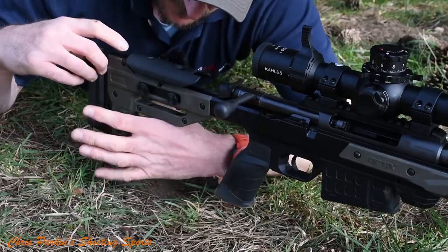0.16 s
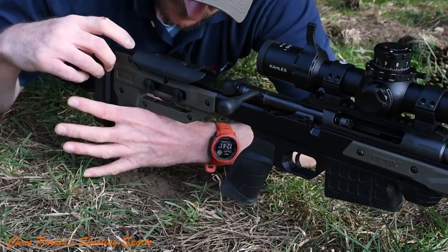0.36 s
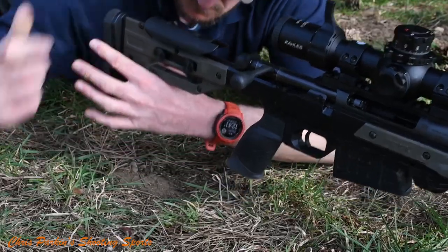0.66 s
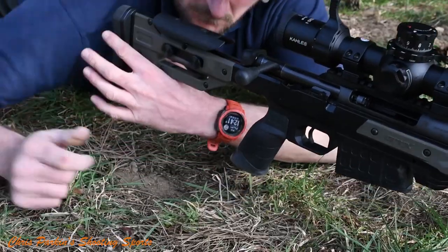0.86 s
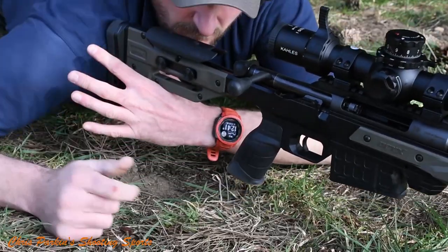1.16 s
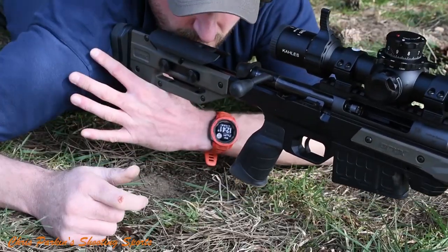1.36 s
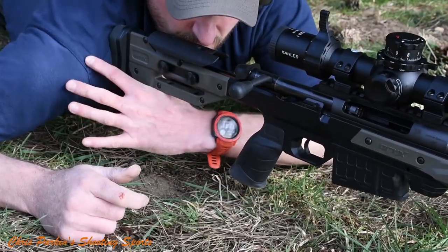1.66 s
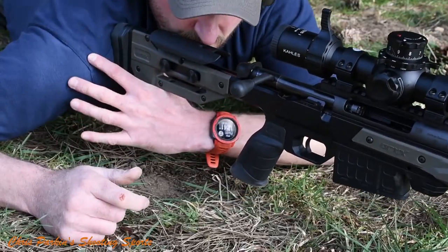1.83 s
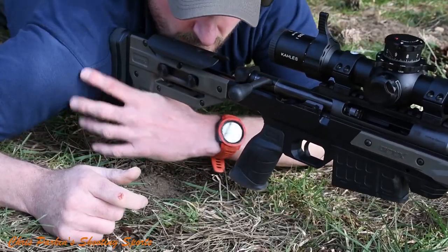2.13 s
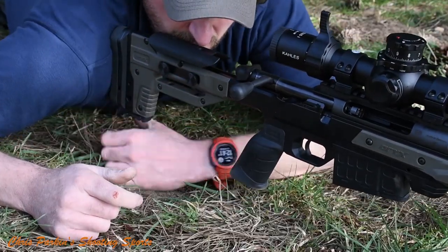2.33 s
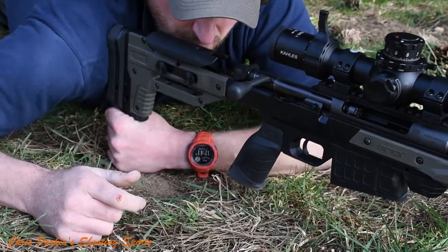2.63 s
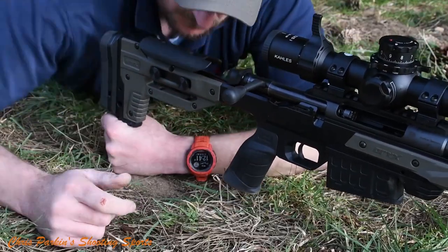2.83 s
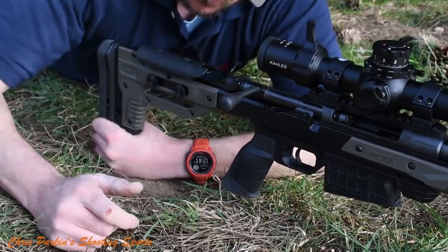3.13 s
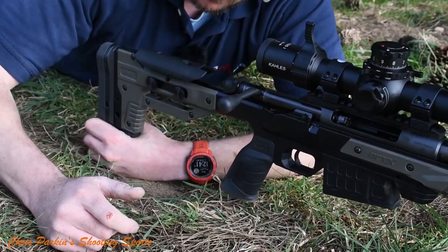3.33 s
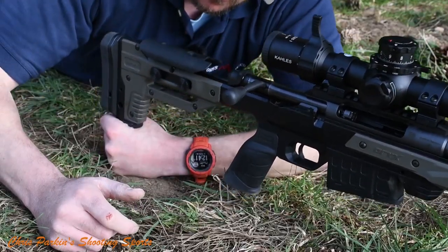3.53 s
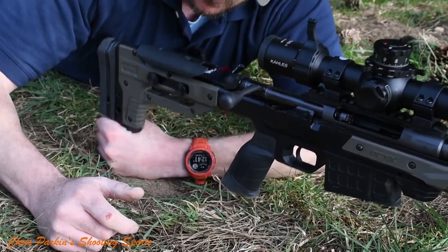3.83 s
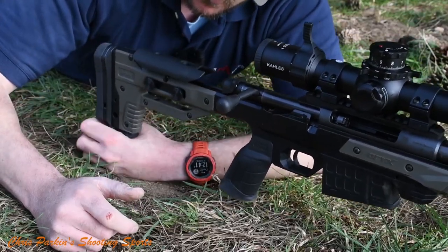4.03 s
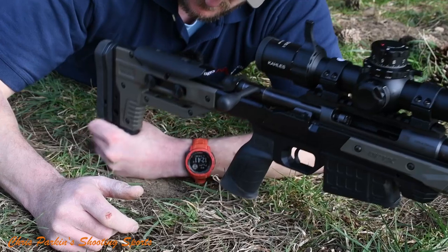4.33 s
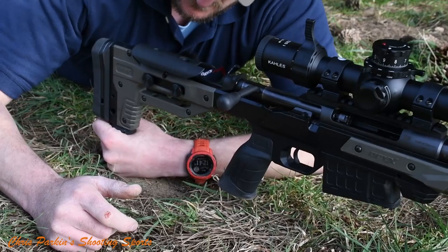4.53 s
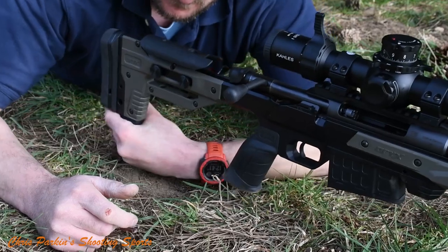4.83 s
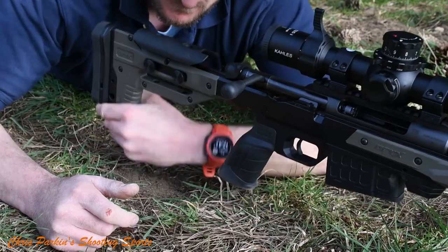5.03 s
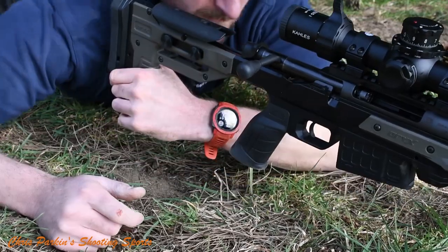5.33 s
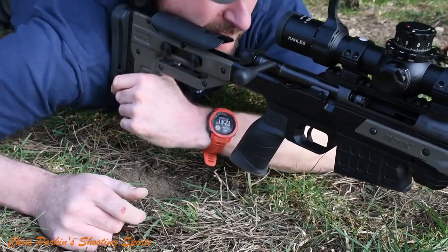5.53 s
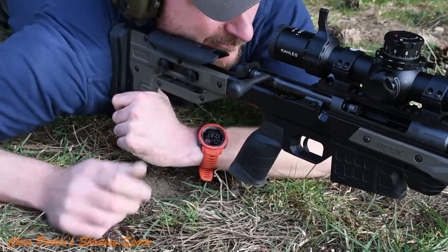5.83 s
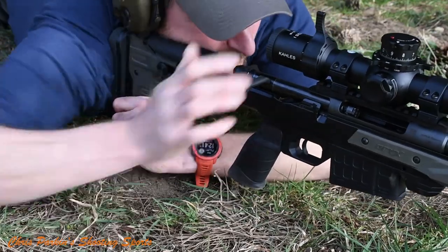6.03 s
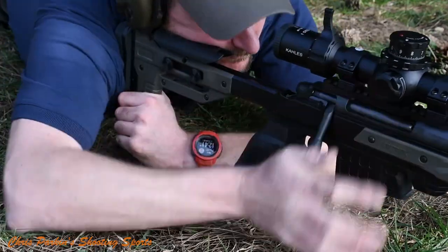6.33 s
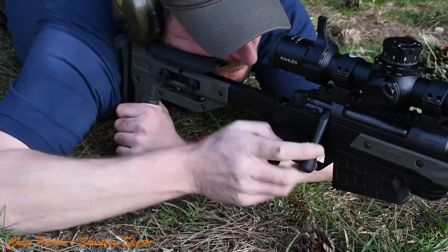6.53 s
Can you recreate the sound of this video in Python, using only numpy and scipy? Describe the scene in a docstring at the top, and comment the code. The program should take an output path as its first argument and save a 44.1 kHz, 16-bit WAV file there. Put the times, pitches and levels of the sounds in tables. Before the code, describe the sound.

A close microphone catches soft fabric and grass rustling, hollow drags on the stock, short skin-on-rubber rubs with little squeaky pips, scattered dry clicks and low thumps, all quiet in open still air. Near the end comes a tight burst of hard steel: bolt lifted, slammed back so loudly it distorts, then pushed home and locked, very dry, without echo.

```python
"""Working a rifle bolt on grass

Outdoors on grass, close to a single microphone. Hands and sleeves shift around a rifle stock as shaped friction noise,
with ticks as short cracks and rings, wipes on rubber pad and stock and a few short pitched pips as noise through
gliding resonances, and bumps of the stock as sliding low tones. Then the steel bolt is lifted, slammed back, pushed
home and locked: bursts of contact force ring the modes of the steel, pushes ring the stock, and slips scrape the
steel. Still air and hiss lie beneath."""
import sys
import numpy as np
from scipy import signal
from scipy.fft import rfft, irfft
from scipy.io import wavfile
from scipy.ndimage import uniform_filter1d, map_coordinates

SR = 44100
rng = np.random.default_rng(int(sys.argv[2]) if len(sys.argv) > 2 else 0)


def elevation(decibels):
    """Turn decibel levels (scalar or array-like) into linear amplitude ratios."""
    levels = np.asarray(decibels, float)
    return 10 ** (levels / 20)


def store_wav(level_fs):
    """Save 16-bit WAV to argv[1]."""
    pcm = np.round(np.clip(np.atleast_2d(level_fs), -1, 1) * 32767)
    wavfile.write(sys.argv[1], SR, pcm.T.astype(np.int16))


N = 294147  # length in samples

# Spectrum of a dry crack. Each row: frequency in Hz, relative level in dB.
CRACK_TONE = [(200, -12.5), (1000, -8), (3000, 2.5), (7000, 1), (11000, -4), (16000, -29)]
# Ringing modes of bolt and receiver. Each row: frequency in Hz, relative level in dB, 60 dB decay in seconds.
STEEL_MODES = [(930, -2.5, 0.011), (1340, -0.5, 0.012), (1490, 0, 0.016), (1730, -2, 0.021),
               (2090, -5.5, 0.014), (2725, -11.5, 0.018), (2934, -1.5, 0.012), (3650, -1.5, 0.004),
               (4200, -8, 0.005), (4700, -6, 0.0029), (5580, -1, 0.0085), (6400, -8, 0.016),
               (7200, 0, 0.0054), (7970, -2, 0.0057), (10000, -20.5, 0.019), (11100, -18.5, 0.0031)]


def evened(x):
    """Scales to rms 1."""
    return x / np.sqrt(np.mean(x ** 2) + 1e-20)


def add(mix, start_s, sound):
    """Mixes a sound in at start_s, cut where the mix ends."""
    part = mix[round(start_s * SR):][:len(sound)]
    part += sound[:len(part)]


def coloured(x, points):
    """Filters x by a curve of (Hz, dB) points, then scales it to rms 1."""
    point_hz, point_db = np.transpose(points)
    hz = np.fft.rfftfreq(len(x), 1 / SR)
    curve_db = np.interp(np.log(hz + 1), np.log(point_hz + 1), point_db)
    return evened(irfft(rfft(x) * elevation(curve_db), len(x)))


def resonant(x, peaks):
    """Passes x through (Hz, width in Hz, dB) resonances, then scales it to rms 1."""
    hz = np.fft.rfftfreq(len(x), 1 / SR)
    shape = sum(elevation(db) / (1 + (2 * (hz - centre) / width) ** 2) for centre, width, db in peaks)
    return evened(irfft(rfft(x) * shape, len(x)))


def ring(modes, tilt_db=0, favoured_hz=1, favour_db=0):
    """Impulse response of decaying modes, tilted per octave about 2 kHz and lifted near one pitch."""
    t = np.arange(SR // 4) / SR
    out = 0
    for k, (hz, db, t60) in enumerate(modes):
        octaves_off = np.log2(hz / favoured_hz)
        db += tilt_db * np.log2(hz / 2000) + favour_db * np.exp(-(octaves_off / 0.23) ** 2)
        sign = (-1) ** k
        out = out + sign * elevation(db - 60 * t / t60) * np.sin(2 * np.pi * hz * t)
    return out


def friction(per_s, spread_db, lumpy_db):
    """Tiny slips of uneven size over a smooth hiss; the pressure wavers in lumps of about 15 ms."""
    slip_size = elevation(spread_db * np.minimum(rng.exponential(1, N), 4))
    slips = slip_size * (rng.random(N) < per_s / SR)
    smoothed = uniform_filter1d(rng.standard_normal(N), size=500)
    lumps = evened(uniform_filter1d(smoothed, size=500))
    return (1 + slips) * elevation(lumpy_db * lumps) * rng.standard_normal(N)


def pressure(strokes, rise_s, arch_db, sag_db, release_s):
    """Gain for every sample from (start s, length s, dB) strokes that rise, arch, sag and let go."""
    t = np.arange(N) / SR
    power = 0
    for start_s, length_s, db in strokes:
        # distance outside the stroke, in time constants: it rises ahead of the start
        edge = np.where(t < start_s, (start_s - t) / rise_s, np.maximum(t - start_s - length_s, 0) / release_s)
        done = np.clip((t - start_s) / length_s, 0, 1)
        stroke_db = db + arch_db * (2 * done - 1) ** 2 + sag_db * done
        power = power + (elevation(stroke_db) * np.exp(-edge)) ** 2
    return np.sqrt(power)


def air():
    """Still air and microphone hiss: steady coloured noise as a middle signal and a weaker side signal."""
    # Hiss spectra of middle and side. Each row: frequency in Hz, relative level in dB per Hz.
    middle_tone = [(15, -26.5), (25, -6.5), (70, 3.5), (180, -6), (309, -3), (384, -9), (531, -10.5),
                   (840, -14.5), (3340, -20), (14400, -22), (16000, -30)]
    side_tone = [(15, -47.5), (25, -9), (217, -1), (249, -3.5), (373, -2.5), (1890, -6), (12500, -6.5),
                 (16000, -8.5)]
    middle = elevation(-58.5) * coloured(rng.standard_normal(N), middle_tone)
    side = elevation(-63) * coloured(rng.standard_normal(N), side_tone)
    return middle, side


def crackle():
    """Dry grass snapping: sparse snaps of uneven size, each dying in a few milliseconds."""
    per_s, t60_s = 45, 0.0064
    t = np.arange(400) / SR
    out = 0
    for snap in rng.standard_normal((8, len(t))):  # eight different snaps share the rate
        size = elevation(2.8 * np.minimum(rng.exponential(1, N), 3))
        hits = size * (rng.random(N) < per_s / 8 / SR)
        out = out + signal.oaconvolve(hits, coloured(snap, CRACK_TONE) * elevation(-60 * t / t60_s))[:N]
    return evened(out)


def handling():
    """Every move rustles cloth, drags the stock and rumbles through the ground, each by its own share."""
    # Shifts of hand, sleeve or body. Each row: start in seconds, length in seconds, sleeve and grass rustle
    # in dB, dragged stock in dB relative to the rustle, rumble in dB relative to the rustle.
    moves = [(0.0, 0.051, -60.5, -8, -14), (0.221, 0.12, -56.5, -7.5, -8), (0.356, 0.12, -73.5, -10, 16),
             (0.538, 0.086, -65, -7, 9), (0.58, 0.15, -58.5, -4, -6), (0.775, 0.074, -55.5, -1, 1),
             (0.862, .22, -56.5, -0.5, 2), (1.121, .16, -60, 2, 1), (1.35, 0.14, -65.5, -0.5, 4),
             (1.544, 0.062, -61.5, -3, 2.5), (1.62, .13, -74.5, -9, 14.5), (1.84, 0.28, -85, -4, 12),
             (2.16, 0.076, -59, -0.5, -3), (2.224, 0.071, -56.5, -1.5, -10),
             (2.303, 0.096, -50.5, -10, -1.5), (2.41, .13, -50, -13, -5.5), (2.617, 0.15, -54, -5.5, 0),
             (2.811, 0.17, -58, -0.5, 1.5), (2.97, 0.12, -54.5, -4, -3), (3.105, 0.23, -63, -3.5, 3.5),
             (3.35, 0.058, -60, -6, 0.5), (3.478, 0.11, -61.5, -3.5, -2.5), (3.675, 0.095, -60.5, -4.5, -5),
             (3.853, 0.13, -63, -3.5, 3), (3.997, 0.097, -59, -5.5, -4.5), (4.122, 0.078, -59.5, -3, 0),
             (4.22, .05, -58, -19, -9), (4.292, 0.15, -58.5, -9.5, -1.5), (4.46, 0.15, -65, -8, 5),
             (4.592, 0.038, -61.5, -1, 1), (4.644, 0.017, -49.5, -8, -2.5), (4.7, 0.13, -57, -11, -0.5),
             (4.81, 0.16, -58, -5, 3.5), (4.951, 0.18, -56.5, -6, -4), (5.129, 0.19, -56, 1.5, -2),
             (5.304, 0.11, -67, 1.5, 5), (5.398, 0.13, -66, 3.5, 2.5), (5.584, 0.16, -60, 4, 7.5),
             (5.809, 0.036, -63, 8, 8.5), (5.877, 0.083, -54.5, -4.5, -0.5), (5.952, 0.21, -59, 6, 7.5),
             (6.264, 0.031, -57, 11.5, 14.5), (6.376, 0.038, -59.5, 9.5, 18), (6.44, .1, -56.5, 2, 10),
             (6.565, 0.029, -57.5, 2, 13), (6.604, 0.053, -60.5, 0.5, 15)]
    # Spectra of rustle and rumble. Each row: frequency in Hz, relative level in dB per Hz.
    rustle_tone = [(120, -24.5), (200, -26.5), (249, -17), (322, -17), (424, -9), (2420, -19.5),
                   (4200, -14), (9060, -15), (16000, -19.5)]
    rumble_tone = [(24, -27.5), (40, 2.5), (81, -12), (119, 0.5), (151, -1.5), (297, 3.5), (401, -4.5),
                   (900, -15), (1170, -26.5), (1980, -120)]
    # Resonances of the dragged stock. Each row: frequency in Hz, width in Hz, relative level in dB.
    drag_peaks = [(750, 1800, 0), (1500, 1100, -4.5), (2047, 1500, -2.5)]
    start_s, length_s, db, drag_db, rumble_db = np.transpose(moves)
    cloth, stock, ground = (
        pressure(zip(start_s, length_s, db + share_db), rise_s=0.018, arch_db=-4, sag_db=-1, release_s=0.033)
        for share_db in (0, drag_db, rumble_db))
    fibres = friction(per_s=400, spread_db=4.0, lumpy_db=1.8)
    rustle = cloth * (coloured(fibres, rustle_tone) + elevation(-9) * crackle())
    drag = stock * resonant(friction(per_s=150, spread_db=4.1, lumpy_db=1.5), drag_peaks)
    # the rumble heaves at random, by a new amount ten times a second
    knots = rng.standard_normal(200)
    heave = elevation(0.5 * np.interp(np.arange(N) / SR * 10, np.arange(len(knots)), knots))
    rumble = ground * heave * coloured(friction(per_s=60, spread_db=3.6, lumpy_db=1.3), rumble_tone)
    return rustle + drag + rumble


def ticks():
    """Loose parts and dry stalks tick: a brief dry crack with one short ring and a dull knock."""
    # Each row: start in seconds, level in dB, ring in Hz, crack in dB relative to that level.
    tick_list = [(0.164, -48.5, 2400, 1.5), (0.344, -45.5, 730, -2), (0.591, -39.5, 1400, -3),
                 (0.816, -39.5, 1780, 4), (0.846, -47, 1210, -2), (0.993, -43, 1250, -10),
                 (1.027, -43.5, 2610, -7), (1.055, -49.5, 1270, 8), (1.082, -42, 2310, -5),
                 (1.2, -47.5, 2200, 3), (1.27, -41, 842, -12), (1.579, -52, 1980, 7),
                 (1.771, -50, 5600, 0.5), (2.16, -34.5, 1770, -2), (2.167, -43, 1810, -1),
                 (2.725, -49, 970, -15), (2.961, -36.5, 6000, 3.5), (2.973, -43, 1310, 3),
                 (3.573, -47.5, 6040, -1), (3.924, -46, 5560, 3), (4.067, -47, 2500, 4),
                 (4.117, -48, 2900, -4), (4.13, -47.5, 1800, 1), (4.22, -41, 3400, 2),
                 (4.408, -45.5, 4070, -1), (4.439, -46.5, 1790, -2), (4.469, -50, 1900, -3),
                 (4.657, -41.5, 4200, 8), (4.811, -37, 2000, -4.5), (5.356, -49, 9000, -6),
                 (6.11, -43, 1300, -7), (6.426, -36, 900, -8)]
    knock_hz, knock_db, knock_t60_s = 600, -6, 0.006
    crack_t60_s, ring_t60_s, ring_rise_s = 0.0068, 0.014, 0.00057
    out, t = np.zeros(N), np.arange(1500) / SR
    knock = np.sin(2 * np.pi * knock_hz * t) * elevation(knock_db - 60 * t / knock_t60_s)
    for start_s, db, hz, crack_db in tick_list:
        crack = coloured(rng.standard_normal(len(t)), CRACK_TONE) * elevation(-60 * t / crack_t60_s)
        tone = np.sin(2 * np.pi * hz * t) * elevation(-60 * t / ring_t60_s) * np.minimum(t / ring_rise_s, 1)
        add(out, start_s, elevation(db) * (elevation(crack_db) * crack + tone + knock))
    return out


def wipes():
    """Skin slides on rubber and stock, with a few short pitched pips: noise that swells and stops."""
    # Each row: crest in seconds, level in dB, swell time in seconds, pitch in Hz of the hollow under the palm
    # or of the pip, glide of that pitch in octaves per second.
    wipe_list = [(0.322, -48, 0.043, 3940, -1.5), (0.615, -56.5, 0.038, 4360, 2),
                 (2.26, -61.5, 0.11, 4740, 1), (2.42, -55.5, 0.091, 4700, 1),
                 (2.69, -56.5, 0.053, 4700, -1), (3.21, -61, 0.056, 4330, 3),
                 (3.37, -59.5, 0.037, 4500, -2), (3.525, -55, 0.033, 4200, -7.5),
                 (3.7, -57.5, 0.028, 4580, 1.5), (3.89, -53.5, 0.026, 4200, -1.5),
                 (3.957, -58, 0.008, 1410, -5), (4.022, -61.5, .022, 4300, 2), (4.171, -54, 0.025, 4350, 1),
                 (4.255, -57.5, .009, 1520, -2), (4.66, -56, 0.023, 4430, 0.5),
                 (4.785, -58, 0.05, 4020, -1.5), (4.85, -61, .05, 2000, 0.5),
                 (4.881, -52.5, 0.02, 4800, 7.5), (5.065, -58, 0.032, 4700, 1),
                 (5.28, -52, 0.0069, 3550, 5), (5.646, -54, 0.11, 1500, 0.5), (6.05, -56, 0.1, 1500, 0),
                 (6.49, -56, 0.03, 5070, -0.5)]
    # Resonances of each sound. Each row: multiple of its pitch, width as a share of its pitch, level in dB.
    hollow = [(.78, 0.15, -3.5), (1., 0.18, 4.5), (1.17, 0.16, -1), (1.9, 1, -9)]
    half = 8000  # samples on either side of the crest
    stop_share = 0.54  # each sound dies in this share of its swell
    out, t = np.zeros(N + SR), np.arange(-half, half) / SR
    rub = friction(per_s=300, spread_db=4.5, lumpy_db=1.5)
    for crest_s, db, swell_s, pitch_hz, glide in wipe_list:
        at = round(crest_s * SR)
        peaks = [(k * pitch_hz, width * pitch_hz, lift_db) for k, width, lift_db in hollow]
        noise = resonant(np.roll(rub, -at)[:len(t)], peaks)
        # reading faster or slower bends every resonance together, by 0.4 octave at most
        place = np.cumsum(2 ** np.clip(glide * t, -0.4, 0.4))
        noise = map_coordinates(noise, [place - place[half] + half], order=3, mode="wrap")
        swell = np.exp(-(t / np.where(t < 0, swell_s, stop_share * swell_s)) ** 2)
        out[at:at + len(t)] += elevation(db) * noise * swell
    return out[half:][:N]


def bumps():
    """The stock bumps on shoulder or hand: a decaying low tone whose pitch settles within milliseconds."""
    # Each row: start in seconds, level in dB, approximate first pitch in Hz, last pitch in Hz,
    # 60 dB decay in seconds.
    bump_list = [(0.8957, -36, 187, 164, 0.09), (0.907, -27.5, 160, 50, 0.054),
                 (1.386, -46.5, 150, 133, 0.18), (1.624, -43, 201, 241, 0.11), (4.66, -43, 200, 95, 0.084),
                 (4.811, -36.5, 300, 168, 0.034), (5.132, -33, 293, 55.3, 0.12),
                 (6.602, -32.5, 200, 115, 0.12)]
    out, t = np.zeros(N), np.arange(8000) / SR
    for start_s, db, first_hz, last_hz, t60 in bump_list:
        turns = last_hz * t + (first_hz - last_hz) * 0.0042 * (1 - np.exp(-t / 0.0037))
        add(out, start_s, elevation(db - 60 * t / t60) * np.sin(2 * np.pi * turns))
    return out


def bolt_blows():
    """Each blow of steel on steel chatters briefly, ringing the steel and thudding into the stock."""
    # Each row: start in seconds, peak of the steel ring in dB, chatter in seconds, thud gain in dB relative
    # to that peak, frequency in Hz that this contact favours.
    blow_list = [(6.1325, -34, 0.00034, -11, 750), (6.163, -29.5, 0.0023, -9, 1870),
                 (6.172, -23.5, 0.0021, -5.5, 710), (6.185, -27.5, 0.0065, -12, 960),
                 (6.195, -28, 0.003, -8, 1340), (6.2201, -10, 0.0052, -9, 700),
                 (6.2284, -12, 0.0046, -18.5, 10000), (6.231, -13, 0.0072, -29.5, 1620),
                 (6.239, 8, 0.0038, -20, 1730), (6.2476, -6.5, 0.0023, -39.5, 1730),
                 (6.29, -34.5, .002, -10.5, 1620), (6.355, -22, 0.0013, -21, 3650),
                 (6.3726, -3, 0.0024, -19, 1600), (6.5985, -19.5, 0.00044, -25, 1770)]
    # Modes of the stock. Each row: frequency in Hz, relative level in dB, 60 dB decay in seconds.
    stock_modes = [(133, -8, 0.15), (265, -11.5, 0.068), (377, -5, 0.082), (446, -8.5, 0.2),
                   (588, -2.5, 0.049), (702, 1, 0.051)]
    # a blow that thuds is padded and dull: tilt in dB per octave of a clean blow, thud in dB where dulling
    # starts, and tilt lost per dB of thud beyond that
    clean_tilt_db, padded_from_db, dulling = 1.66, -19, 0.38
    out, t = np.zeros(N), np.arange(1500) / SR
    push = signal.windows.hann(24) / 12  # the softer stock feels only the mean force
    thud = signal.fftconvolve(push, ring(stock_modes))
    for start_s, db, chatter_s, thud_db, hz in blow_list:
        tilt_db = clean_tilt_db - dulling * max(thud_db - padded_from_db, 0)
        fade = np.exp(-(t / chatter_s) ** 2)
        rebounds = elevation(3.5 * rng.exponential(1, len(t)) - 6.5)  # of uneven size
        force = rng.standard_normal(len(t)) * fade * rebounds
        force[0] = 8  # the first contact is a hard one
        clank = signal.fftconvolve(force, ring(STEEL_MODES, tilt_db, hz, favour_db=7.3))
        crack = coloured(rng.standard_normal(len(t)), CRACK_TONE) * fade  # the contact itself, broad and dry
        add(out, start_s, elevation(db) * clank / abs(clank).max())
        add(out, start_s, elevation(db - 11.5 + 2.18 * tilt_db) * crack)
        add(out, start_s, elevation(db + thud_db) * thud)
    return out


def bolt_slides():
    """The bolt slides and rattles in its track: friction slips scrape the same steel and crack dryly."""
    # Each row: start in seconds, length in seconds, level in dB.
    slide_list = [(6.185, 0.058, -42.5), (6.235, 0.034, -32), (6.27, 0.059, -52.5), (6.374, 0.0108, -40),
                  (6.41, .035, -55.5)]
    slips = friction(per_s=600, spread_db=4.1, lumpy_db=2.2)
    ringing = evened(signal.fftconvolve(slips, ring(STEEL_MODES))[:N])
    scrape = evened(ringing + 1.8 * coloured(slips, CRACK_TONE))
    return pressure(slide_list, rise_s=0.004, arch_db=-1.5, sag_db=-4, release_s=0.0081) * scrape


def scene():
    """All sources are central; only part of the hiss differs between the channels."""
    hiss, side = air()
    mid = hiss + handling() + ticks() + wipes() + bumps() + bolt_blows() + bolt_slides()
    return np.array([mid + side, mid - side])


def roll_off(x):
    """The treble ends steeply here."""
    return signal.sosfilt(signal.butter(12, 16360, fs=SR, output="sos"), x)


def record(dry):
    """The loudest blow overloads the microphone input: peaks beyond full scale are cut flat."""
    mix = np.clip(dry, -1, 1)
    return roll_off(mix)


dry = scene()
out = record(dry)
store_wav(out)
```